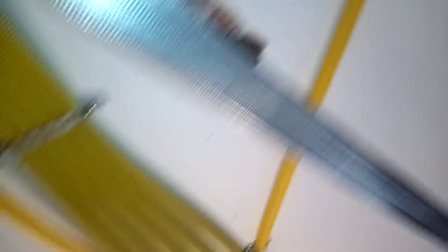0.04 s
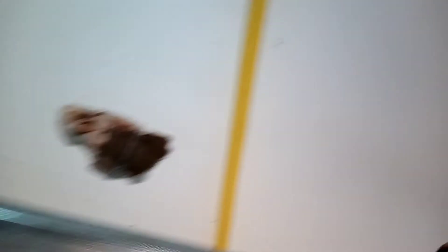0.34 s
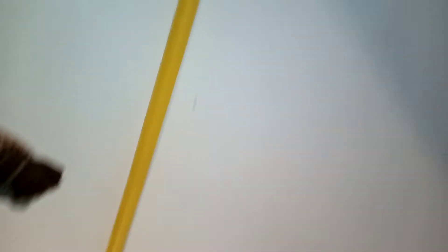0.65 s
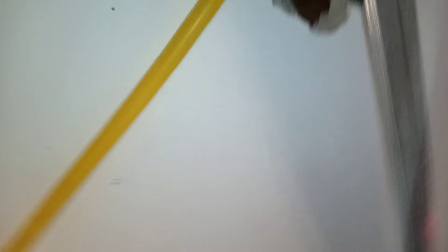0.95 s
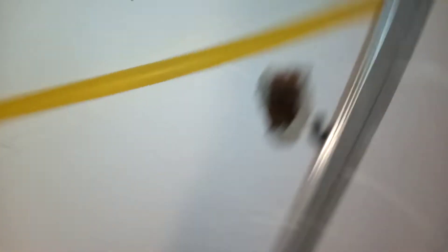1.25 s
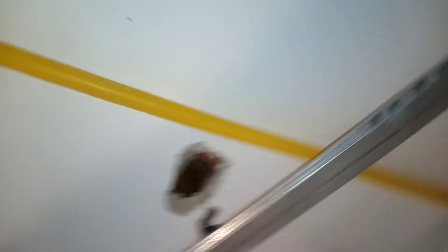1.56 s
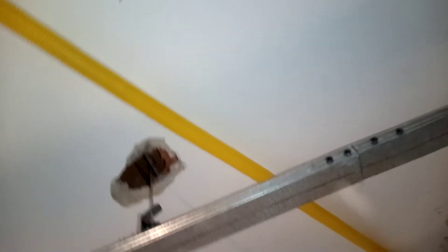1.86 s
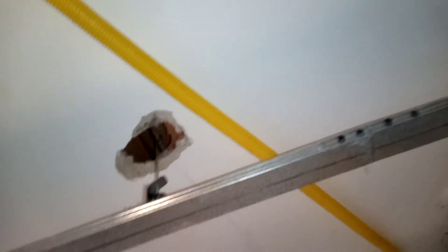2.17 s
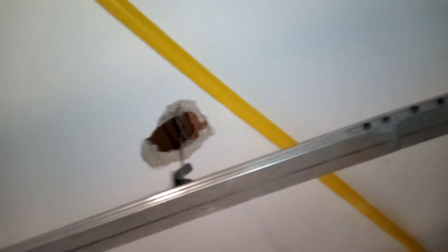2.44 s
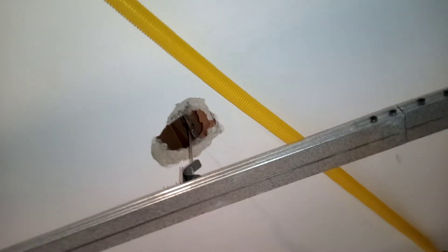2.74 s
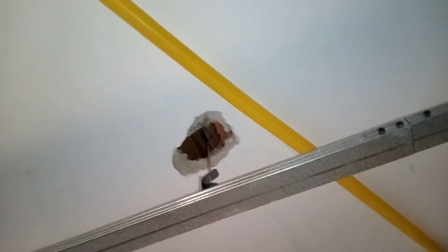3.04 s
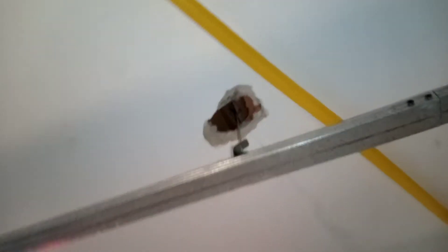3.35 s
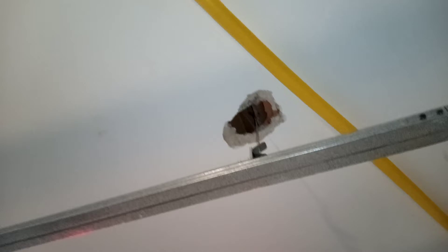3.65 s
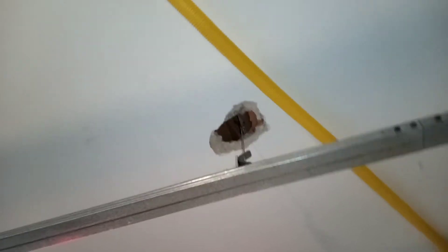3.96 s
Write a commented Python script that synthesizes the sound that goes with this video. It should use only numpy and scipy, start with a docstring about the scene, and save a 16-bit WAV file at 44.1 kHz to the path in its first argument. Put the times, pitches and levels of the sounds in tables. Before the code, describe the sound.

A hammer drill rattles and whines, revs twice briefly, then winds down indoors.

```python
"""A rotary hammer drill coasts against the ceiling of a bare room, its whine falling and its hammer
rattling in step with the rotor. Near 1 s the steel bit binds and squeaks. The trigger is blipped at
1.35 s and again at 2 s; each time the brushes rasp and the motor speeds up. Then it winds down, and
from about 3.1 s the bit scrapes three times in the hole. Throughout, a low drone swells and fades
over a faint hum and the rumble of the building."""
import sys
import numpy as np
from scipy import signal
from scipy.fft import rfft, irfft, next_fast_len
from scipy.io import wavfile
from scipy.ndimage import uniform_filter1d, map_coordinates

SR = 44100
rng = np.random.default_rng(int(sys.argv[2]) if len(sys.argv) > 2 else 0)


def transcribe(signal):
    """Save signal, clipped to [-1, 1], as a 16-bit WAV file at the path in sys.argv[1]."""
    frames = np.atleast_2d(signal).T
    limited = np.clip(frames, -1, 1)
    pcm = np.round(limited * 32767).astype(np.int16)
    wavfile.write(sys.argv[1], SR, pcm)


N = 176400

# Rotation of the motor. Each row: time in seconds, speed in turns per second.
ROTOR_SPEED = [(0, 352), (.15, 317), (.4, 263), (.8, 194), (1.05, 160), (1.32, 122), (1.35, 162),
               (1.41, 258), (1.45, 290), (1.52, 281), (2.0, 198), (2.08, 315), (2.17, 368), (2.4, 311),
               (2.65, 259), (2.95, 212), (3.2, 175), (3.6, 116), (4, 68)]
# Effort of the drill. Each row: time in seconds, relative levels in dB of rattle and of air and gears.
EFFORT = [(0, -22, -29), (.2, -24, -28.5), (.5, -27, -30), (.8, -32, -32), (.95, -39.5, -35),
          (1.12, -37, -34.5), (1.33, -39, -38.5), (1.43, -27.5, -29), (1.55, -27, -29), (1.8, -32.5, -31),
          (2.02, -32.5, -33), (2.12, -24, -27), (2.5, -25, -29.5), (2.75, -29.5, -32.5), (3.05, -35.5, -34),
          (3.28, -40.5, -37.5), (3.55, -43, -38), (3.75, -46.5, -41.5), (4, -51, -45)]


def hammer_blows(speed, turns_per_blow=5.33, decay_s=.004, scatter_db=2.2):
    """Damped impacts: each turn of the crank starts an envelope that decays exponentially."""
    crank_turns = np.cumsum(speed) / SR / turns_per_blow
    strength = amp(scatter_db * rng.standard_normal(1000))[crank_turns.astype(int)]
    since_blow_s = (crank_turns % 1) * turns_per_blow / speed
    return strength * np.exp(-since_blow_s / decay_s)


def hammer_rattle(blows, level_db, chatter=.85):
    """Impact excitation: blows and irregular chatter drive the casing over a broad band."""
    # Broad response of the casing. Each row: frequency in Hz, relative level in dB.
    casing_spectrum = [(60, -46), (200, -26), (390, -21.5), (500, -15.5), (650, -14), (850, -4), (1100, -1),
                       (1350, 0), (1680, 2), (1950, -1), (2300, -5.5), (4000, -7.5), (7000, -14),
                       (10000, -20), (16000, -32)]
    force = noise() * (blows + chatter * amp(1.26 * wobble(260)))
    return amp(level_db - .5) * coloured(force, casing_spectrum)


def air_and_gears(speed, blows, level_db):
    """Amplitude modulation: the blows pulse the rush of air and a high fizz, over the whirr of the gears."""
    # Spectra of air and gears, and of the fizz. Each row: frequency in Hz, relative level in dB.
    air_spectrum = [(40, -15), (150, -9), (500, -6), (850, 6), (1300, -6.5), (2400, 0.5), (3200, -1),
                    (4400, 1.5), (5500, 0), (6600, 2.5), (7900, -14), (10000, -15), (12000, -23),
                    (14000, -31), (14700, -10), (16000, -9)]
    fizz_spectrum = [(2000, -17), (6000, 6), (8000, -10), (10500, 2), (13000, -8), (14100, -2), (14700, -1),
                     (16000, 3.5)]
    grit = (1 + .44 * blows) * amp(1.22 * wobble(500))
    air = amp(.5) * coloured(noise() * grit, air_spectrum)
    gears = amp(-9.5) * coloured(gear_mesh(speed), air_spectrum)
    fizz_db = -44.5 + 1.97 * (level_db - level_db.mean())  # swings about twice as far as the air
    fizz = coloured(noise() * grit * amp(3.6 * wobble(900)), fizz_spectrum)
    return amp(level_db) * (air + gears) + amp(fizz_db) * fizz


def gear_mesh(speed, harmonics=70, roughness=.014):
    """Transmission error: uneven teeth give many wavering harmonics of the rotor speed."""
    turns = np.cumsum(speed * (1 + roughness * wobble(90))) / SR
    draws = rng.random((harmonics, 2))
    return sum(np.sqrt(-np.log(chance)) * np.sin(2 * np.pi * (k * turns + phase))  # Rayleigh amplitudes
               for k, (chance, phase) in enumerate(draws, 1))


def casing_resonance(x):
    """Modal superposition: narrow resonances of the casing add to the sound that drives them."""
    # Casing modes. Each row: frequency in Hz, bandwidth in Hz, peak gain of the mode alone in dB.
    modes = [(253.4, 8.2, -1), (399, 52, -5.5), (804, 15, -16), (946, 14, -9.5), (1714, 20, -25),
             (2002, 47, -9), (1554, 210, -14)]
    return filtered(x, lambda f: 1 + sum(amp(db) * 1j * f * width / (hz * hz - f * f + 1j * f * width)
                                         for hz, width, db in modes))


def fan(speed, air_db, flutter_hz=16, db_per_octave=12):
    """Rotational harmonics: fan tones sweep through the housing's response and weaken at low speed."""
    # Fan tones. Each row: multiple of the rotor speed, relative level in dB.
    orders = [(4, -9.5), (5, -26.5), (6, -15), (10, -11)]
    # Transmission through the housing. Each row: frequency in Hz, gain in dB.
    housing = [(200, -22), (400, -21), (650, -27), (790, -1.5), (930, 2.5), (1100, -4.5), (1550, 1),
               (2100, -7.5), (4500, -21)]
    fan_db = air_db + db_per_octave * np.minimum(np.log2(speed / speed.mean()), 0)
    tones = np.zeros(N)
    for order, db in orders:
        hz = order * speed
        level_db = fan_db + db + along(housing, hz) + .83 * wobble(25.27)
        tones += amp(level_db) * tone(hz + flutter_hz * wobble(90))
    return tones


def motor_whine(speed, orders=(25, 32), width_hz=140):
    """High rotational orders: two ragged whines rise and fall in proportion to the rotor speed."""
    # Whine strength. Each row: speed in turns per second, levels in dB of the lower and upper whine.
    whine_levels = [(75, -46, -58), (116, -45, -68), (163, -44.5, -70), (188, -52, -67), (242, -61, -54),
                    (271, -48, -44), (320, -56, -43), (368, -66, -45)]
    speeds, *levels = np.transpose(whine_levels)
    return sum(amp(np.interp(speed, speeds, db)) * narrow_noise(order * speed, width_hz)
               for order, db in zip(orders, levels))


def brush_rasp(speed, order=12, width_hz=520):
    """Sliding contact: the brushes rasp around a multiple of the rotor speed while the trigger is held."""
    # Trigger pulls. Each row: start in seconds, end in seconds, level of the brushes in dB.
    pulls = [(1.35, 1.415, -33), (2.0, 2.06, -37)]
    t = clock()
    held = sum(amp(db) * ((t > start) & (t < end)) for start, end, db in pulls)
    return uniform_filter1d(held, size=900) * narrow_noise(order * speed, width_hz)


def bit_squeak(waver_hz=36, flutter_db=2.5):
    """Stick-slip friction: the bit binds in the hole and sings in its modes with every slip."""
    # Modes of the steel bit. Each row: frequency in Hz, level in dB.
    modes = [(2568, -47), (4355, -38), (6930, -38.5), (10110, -42), (11294, -47), (11719, -52),
             (13281, -43), (14560, -52)]
    # Slips. Each row: time of the peak in seconds, length in seconds, gain in dB.
    slips = [(.93, .03, -10), (.964, .021, 3), (1.005, .033, 3), (1.055, .03, -5), (1.09, .035, -9)]
    envelope = sum(amp(db) * np.exp(-(2 * (clock() - peak) / length) ** 2) for peak, length, db in slips)
    ring = sum(amp(db + flutter_db * wobble(70)) * tone(hz + waver_hz * wobble(250)) for hz, db in modes)
    return envelope * ring


def bit_scrapes():
    """Friction and impact: the slowing bit grinds on the edge of the hole and bumps the ceiling."""
    # Scrapes. Each row: start, attack and decay in seconds, gains in dB of the grind and of the thud.
    strokes = [(3.13, 0.024, .06, -31.5, -54), (3.361, 0.025, 0.095, -33, -63),
               (3.947, 0.01, 0.069, -35.5, -42)]
    # Resonances that the scraping rings. Each row: frequency in Hz, relative level in dB.
    modes = [(865, -13), (1470, -6.5), (1690, -8)]
    # Spectra of the grind and of the ceiling's thud. Each row: frequency in Hz, relative level in dB.
    grind_spectrum = [(60, -15), (400, -7.5), (600, -10), (900, -4.5), (1250, -5), (1550, -1), (2000, -4),
                      (3000, -9.5), (6500, -19), (9000, -30), (16000, -29)]
    thud_spectrum = [(40, -22), (110, 3), (200, -7), (300, -13), (400, -7), (550, -15), (1500, -28),
                     (16000, -70)]
    t = clock()
    ring = sum(amp(db) * narrow_noise(np.full(N, hz), width_hz=60) for hz, db in modes)
    grind = coloured(noise() * amp(2.3 * wobble(250)), grind_spectrum) + ring
    thud = coloured(noise(), thud_spectrum)
    scrapes = np.zeros(N)
    for start, attack, decay, grind_db, thud_db in strokes:
        rise = np.clip((t - start) / attack, 0, 1)
        fall = np.exp(-np.maximum(t - start - attack, 0) / decay)
        scrapes += rise * fall * (amp(grind_db) * grind + amp(thud_db) * thud)
    return scrapes


def room(x, wet_db=-9, positions=14):
    """Reverberation: bare walls return decaying reflections whose pattern shifts as the microphone moves."""
    # Decay of the room. Each row: frequency in Hz, time to fall by 60 dB in seconds.
    reverb_times = [(100, .3), (1500, .28), (6000, .22), (14000, .16)]
    wet = np.zeros(N)
    place = clock() * (positions - 1) * SR / N
    for k in range(positions):
        hz, t, spectra = signal.stft(rng.standard_normal(SR // 2), SR, nperseg=256)
        decay = amp(-60 * t / along(reverb_times, hz)[:, None])
        tail = signal.istft(spectra * decay, SR, nperseg=256)[1]
        tail = np.pad(tail / np.linalg.norm(tail), (130, 0))  # 3 ms behind the direct sound
        crossfade = np.sqrt(np.maximum(1 - abs(place - k), 0))
        wet += signal.fftconvolve(x * crossfade, tail)[:N]
    return (x + amp(wet_db) * wet) / np.hypot(1, amp(wet_db))


def background(hum_hz=117, hum_db=-60):
    """Superposition: a wandering low drone and a faint hum add to the rumble of the building."""
    # Course of the drone. Each row: time in seconds, frequency in Hz, level in dB.
    drone_course = [(0, 73, -64), (.3, 53.4, -77), (.48, 53, -51.5), (.95, 51.6, -56), (1.1, 58.5, -82),
                    (1.35, 66, -50.5), (1.64, 71.5, -35.5), (1.82, 75.6, -49), (1.95, 78.77, -54),
                    (2.2, 74.2, -65), (2.36, 74.5, -50), (2.6, 71.94, -40.5), (2.78, 70, -62),
                    (3.1, 52.77, -55), (3.4, 51.7, -43), (3.55, 53, -46), (3.67, 57, -71), (4, 59, -49)]
    # Spectrum of the rumble. Each row: frequency in Hz, relative level in dB.
    rumble_spectrum = [(25, -31), (50, -8), (80, 4), (130, -7.5), (250, -11.5), (600, -15), (2000, -8),
                       (16000, -36)]
    # Swell of the rumble. Each row: time in seconds, level in dB.
    rumble_swell = [(0, -67), (1.1, -57), (2.7, -47), (3.2, -42), (4, -45.5)]
    drone_hz, drone_db = curves(drone_course)
    rumble_db, = curves(rumble_swell)
    hum = amp(hum_db + 1.1 * wobble(3.95)) * tone(hum_hz + 1.23 * wobble(4.92))
    return amp(drone_db) * tone(drone_hz) + hum + amp(rumble_db) * coloured(noise(), rumble_spectrum)


def amp(db):
    return 10 ** (np.asarray(db) / 20)


def unit_rms(x):
    return x / np.sqrt(np.mean(x ** 2) + 1e-20)


def clock():
    return np.arange(N) / SR


def noise():
    return rng.standard_normal(N)


def along(points, hz):
    """Interpolation of (Hz, value) points on a logarithmic frequency axis."""
    f, values = np.transpose(points)
    return np.interp(np.log(hz + 1), np.log(f + 1), values)


def curves(rows):
    """Linear interpolation: one value per sample for each column after the time."""
    times, *columns = np.transpose(rows)
    return [np.interp(clock(), times, column) for column in columns]


def wobble(rate):
    """A smooth random curve with rate knots a second."""
    return map_coordinates(rng.standard_normal(N // 8), [clock() * rate + 2], mode="wrap")


def filtered(x, response):
    """Linear filtering: the spectrum of x times a function of frequency."""
    size = next_fast_len(N + SR // 2)
    return irfft(rfft(x, size) * response(np.fft.rfftfreq(size, 1 / SR)), size)[..., :N]


def coloured(x, spectrum):
    """Spectral shaping of x by (Hz, dB) points, at rms 1."""
    return unit_rms(filtered(x, lambda hz: amp(along(spectrum, hz))))


def tone(hz):
    """A sine of rms 1 whose phase is the integral of a pitch curve."""
    return np.sqrt(2) * np.sin(2 * np.pi * (np.cumsum(hz) / SR + rng.random()))


def narrow_noise(hz, width_hz):
    """Random modulation spreads a pitch curve into a narrow band of rms 1."""
    phase = 2 * np.pi * np.cumsum(hz) / SR
    return unit_rms(wobble(width_hz) * np.cos(phase) + wobble(width_hz) * np.sin(phase))


def scene():
    """One rotor drives hammer, gears and motor; these and the bit sound in the room, heard at one point."""
    speed, = curves(ROTOR_SPEED)
    rattle_db, air_db = curves(EFFORT)
    blows = hammer_blows(speed)
    body = casing_resonance(hammer_rattle(blows, rattle_db) + air_and_gears(speed, blows, air_db))
    motor = fan(speed, air_db) + motor_whine(speed) + brush_rasp(speed)
    mono = room(body + motor + bit_squeak() + bit_scrapes()) + background()
    return np.array([mono, mono])


def record(dry, top_hz=15750):
    """Band limiting: an ideal low-pass filter removes the highest treble."""
    return filtered(dry, lambda hz: hz < top_hz)


dry = scene()
out = record(dry)
transcribe(out)
```